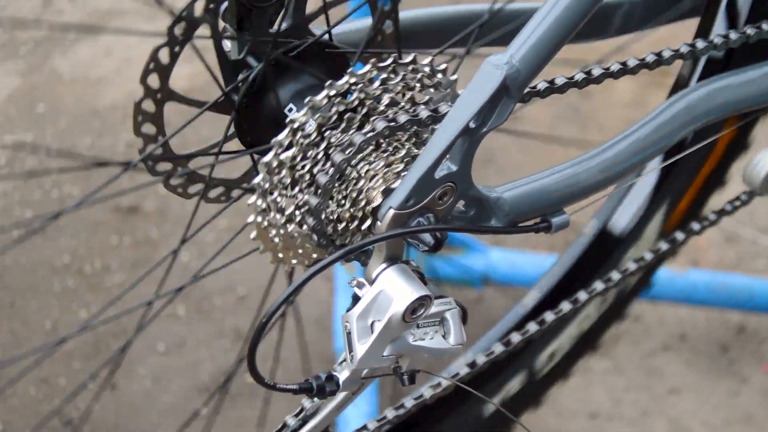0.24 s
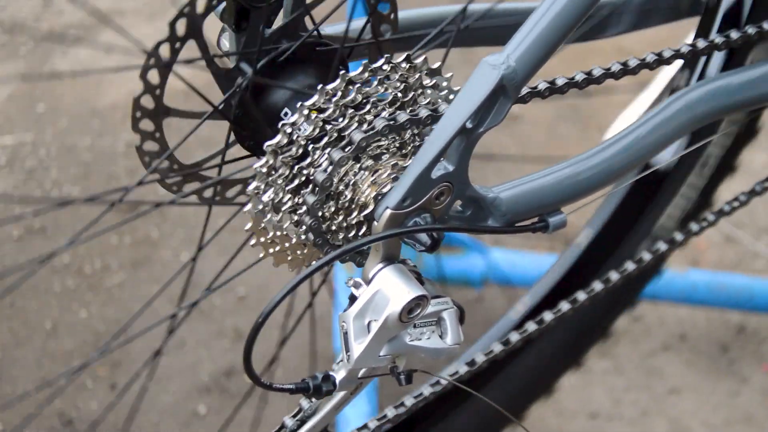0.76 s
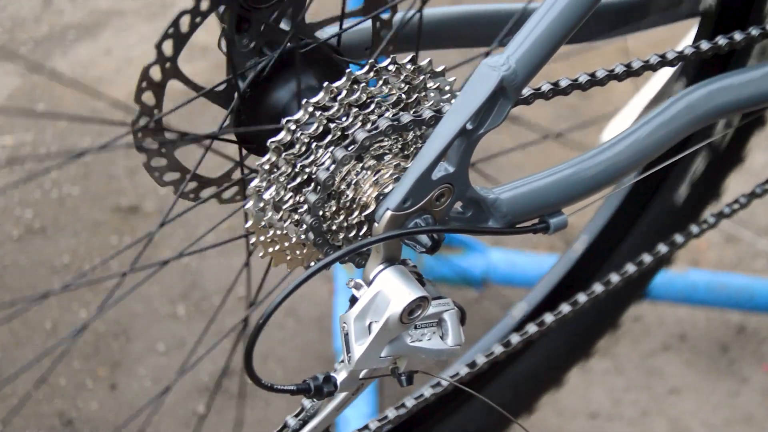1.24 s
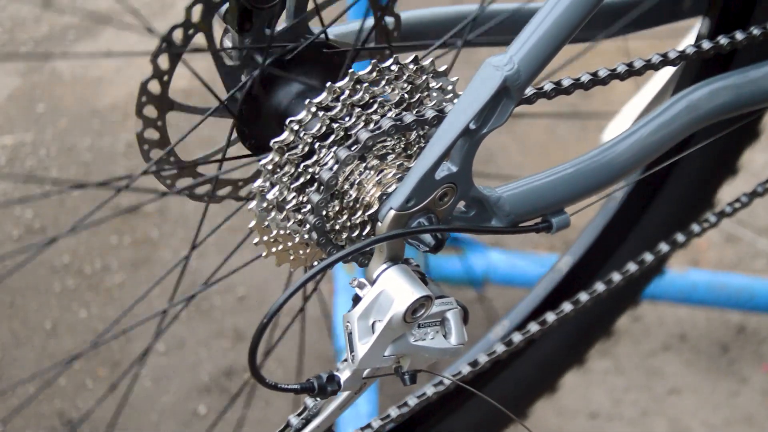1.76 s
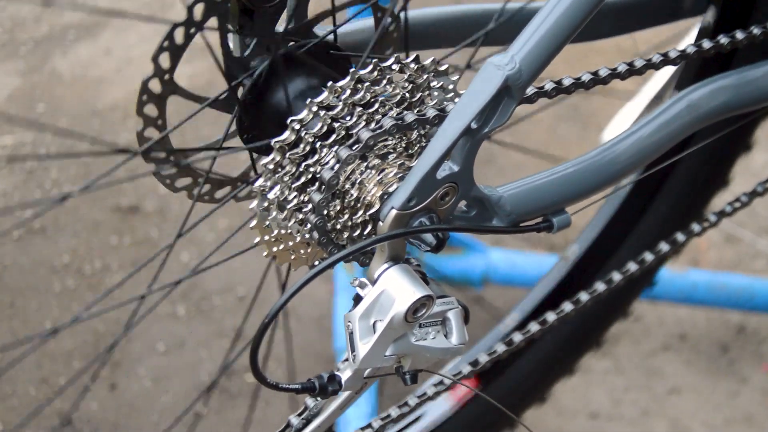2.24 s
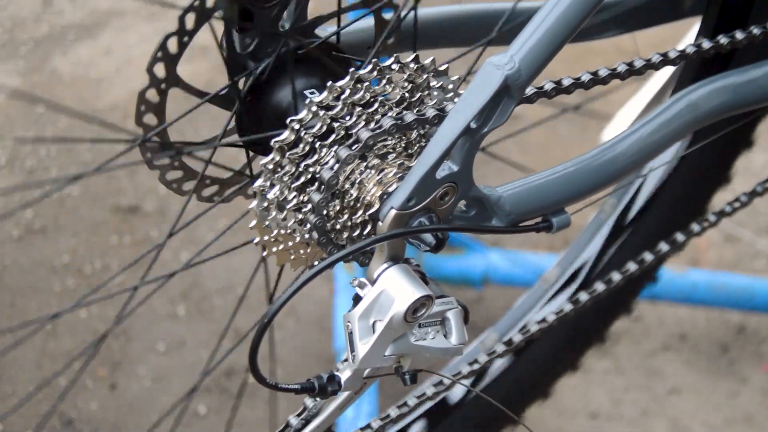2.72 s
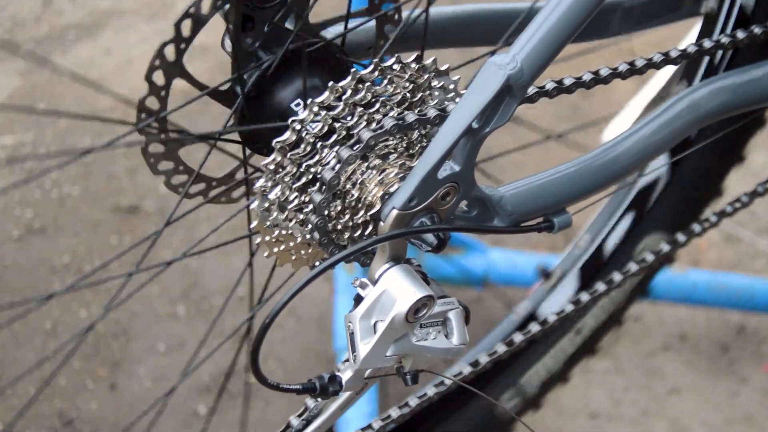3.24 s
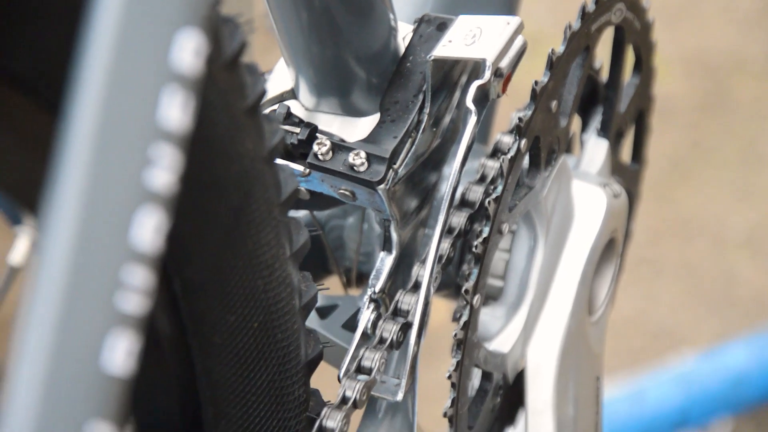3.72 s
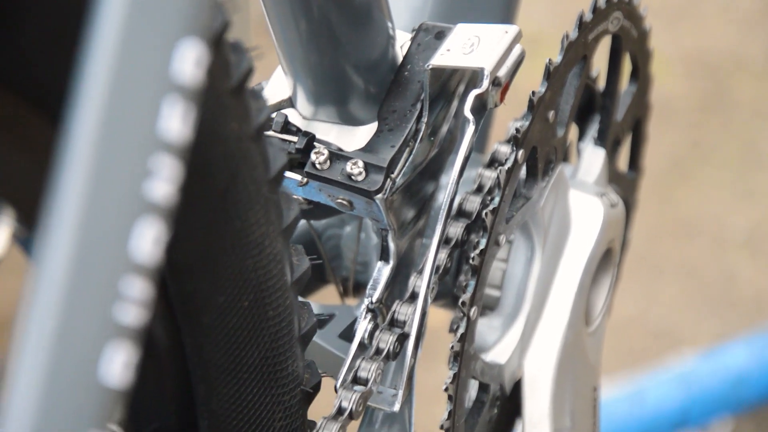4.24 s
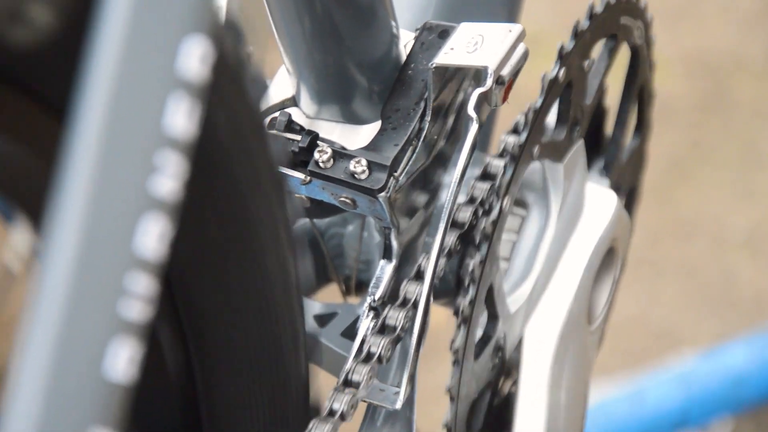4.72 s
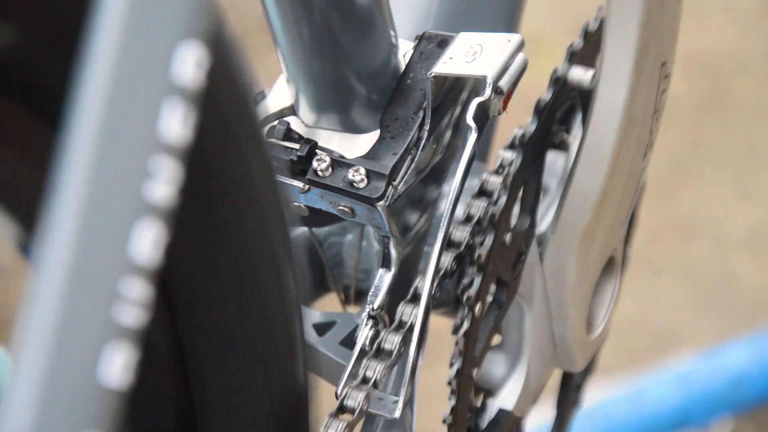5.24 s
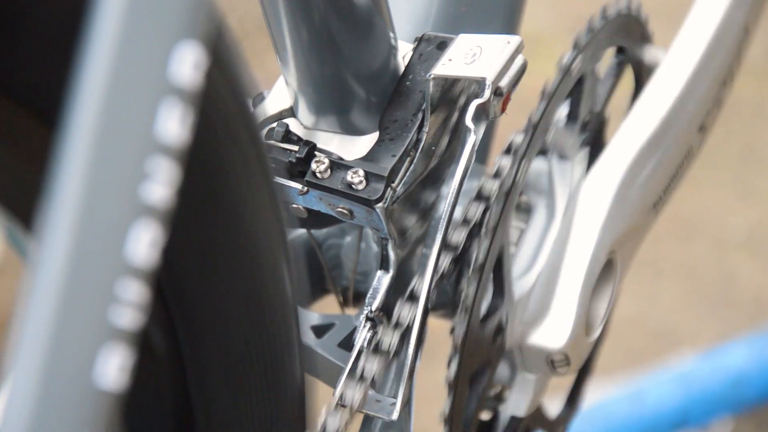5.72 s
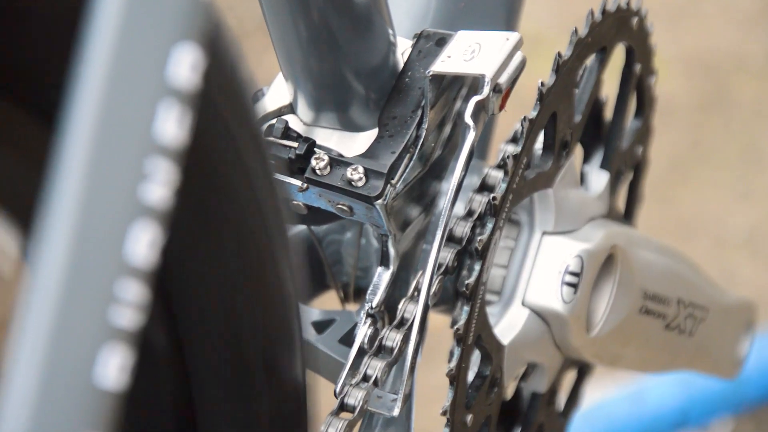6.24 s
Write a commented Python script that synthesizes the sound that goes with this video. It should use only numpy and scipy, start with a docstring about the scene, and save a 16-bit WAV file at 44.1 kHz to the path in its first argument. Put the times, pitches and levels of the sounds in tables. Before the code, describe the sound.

Close mono pickup of a bicycle on a work stand in an open workshop, over soft outdoor air, faint low hums and barely audible chain rustle. From 0 to 0.6 s come a few small clicks and thin pings. At 0.85 s the freehub starts ticking: bright, dry steel snaps, nearly fifteen per second, slowing evenly to about twelve and ending near 3.4 s, each tick subtly doubling and tightening as the wheel turns. A click with a short ping falls at 3.5 s, then near quiet with a soft thud at 3.9. Around 4.8 s there are clicks and a faint scrape; at 5.05 s a loud clank, at 5.15 a brighter ringing one. Ticks run from 5.33, becoming irregular, with dull thuds at 5.7-5.9 and hard knocks near 5.97. Steady ticking returns from 6.1 to the end at about 6.5. A small bird chirps faintly after 5.1.

```python
"""An open workshop with a bicycle on a work stand. The rear wheel coasts under constant deceleration and the
freehub pawls tick: filtered noise for the crack, damped sines for the hub. The crank is turned and the chain
drops onto another chainring with two bright clanks, of grainy noise and decaying modes; the pawls tick again.
Frame thuds, chain rustle and single clicks are coloured noise, hard knocks are pressure pulses, thin steel
pings. A small bird whistles in gliding sines over outdoor noise and faint low hums."""
import sys
import numpy as np
from scipy import signal
from scipy.fft import rfft, irfft, next_fast_len
from scipy.io import wavfile
from scipy.ndimage import uniform_filter1d

SR = 44100
rng = np.random.default_rng(int(sys.argv[2]) if len(sys.argv) > 2 else 0)


def to_wav(sig):
    """Store sig (one row per channel, or 1-D mono) as 16-bit WAV at the path in sys.argv[1].

    Samples outside -1..1 are clipped; the rate is SR.
    """
    pcm = np.clip(np.atleast_2d(sig), -1, 1) * 32767
    pcm = np.round(pcm).astype(np.int16)
    wavfile.write(sys.argv[1], SR, pcm.T)  # frames by channels


N = 285327   # length [samples]
AGE = np.arange(2 ** 14) / SR   # time since a contact [s]
CUTOFF_HZ = 15900

# Spectra below are relative densities; levels of blows are nominal, before the mix of their parts.
# Outdoor air, spectrum: (frequency [Hz], level [dB per Hz])
AIR_SPECTRUM = [(20, -10), (45, 0), (90, -0.5), (150, -3.5), (230, -5.5), (380, -9.5), (650, -8.5),
                (1020, -6.5), (1400, -12), (1900, -12.5), (2700, -20.5), (4500, -25.5), (10800, -28),
                (16000, -34)]
# Slow swell of the distant noise, used as deviation from its mean: (time [s], level [dB])
AIR_SWELL = [(0.0, -53), (2.99, -50.5), (4.18, -52.5), (5.0, -52)]
RUMBLE_DB, MIDDLE_DB, HISS_DB = -56.5, -52.6, -59   # air below 250 Hz, in between, above 2800 Hz
RUMBLE_FOLLOWS, MIDDLE_FOLLOWS = 0.51, 0.89   # share of the swell in each band
HISS_FOLLOWS = 0.33   # share of the chain's level swing in the hiss
# Faint low hums, one of them (88 Hz) the drone of the spinning wheel:
# (middle [s], width [s], frequency [Hz], level [dB])
HUM_SWELLS = [(.1, .4, 161, -65), (.48, 0.14, 56.5, -54), (1.98, 0.29, 55.9, -61), (2.7, 1.1, 88.1, -63),
              (5.2, 1.15, 162.3, -63.5), (5.3, .33, 56.4, -56)]

# Bird notes: (time [s], length [s], start frequency [Hz], end frequency [Hz], level [dB])
BIRD_NOTES = [(5.092, .019, 4250, 4230, -43), (5.179, 0.044, 4820, 4900, -44.5),
              (5.357, 0.049, 4700, 4680, -47.5), (5.483, .015, 4800, 5300, -49),
              (5.492, 0.022, 4340, 4420, -43.5), (5.518, 0.015, 5440, 5130, -44),
              (5.555, 0.013, 4450, 4900, -45.5), (5.591, 0.032, 3870, 4180, -42.5),
              (5.636, 0.024, 4240, 4950, -43.5), (6.052, .031, 4450, 3330, -46.5),
              (6.1, .039, 3530, 3330, -48.5), (6.148, 0.025, 3540, 3480, -43.5),
              (6.203, .017, 4000, 3300, -46), (6.384, .022, 4260, 4200, -52)]
BIRD_SAG_HZ = 30   # dip at the middle of each glide

# Dull blows through frame and stand: (time [s], level [dB])
THUDS = [(.984, -43), (3.922, -39.5), (3.937, -43), (5.6967, -28), (5.788, -29.5), (5.803, -30),
         (5.847, -36), (5.872, -35.5)]
# Thud spectrum: (frequency [Hz], level [dB per Hz])
THUD_SPECTRUM = [(60, -21), (240, -1.5), (420, -7.5), (680, -0.5), (1150, -7.5), (1900, -9), (3200, -17),
                 (5500, -18.5), (9000, -24.5), (16000, -40)]
THUD_T60_S = 0.06
# Dry knocks of the handled crank: (time [s], peak level [dB], frequency [Hz])
KNOCKS = [(5.777, -40, 89), (5.9546, -26.5, 1390), (5.9611, -23.5, 1700), (5.9835, -19, 1130),
          (6.016, -32.5, 1810)]
# Spectrum of the tail of a knock: (frequency [Hz], level [dB per Hz])
KNOCK_TAIL_SPECTRUM = [(150, -31), (500, -9), (1300, 3.5), (2000, -9.5), (4000, -16.5), (12000, -33)]

# Chain creeping over the sprockets: (time [s], level [dB])
RUSTLE = [(0, -58.5), (.85, -60), (3.3, -62), (3.7, -62), (4.45, -62), (4.7, -63.5), (5.0, -55),
          (5.85, -56), (6.47, -55)]
# Single clicks of the drivetrain, chain links or slow pawls: (time [s], level [dB], brightness [dB per octave])
CLICKS = [(.092, -45.5, 2), (0.2183, -34.5, 5.5), (.286, -43.5, -9), (.311, -46, 6), (.342, -44, 1),
          (.525, -43.5, -4), (.536, -42.5, -3), (0.5745, -32, 2), (3.5085, -34.5, -2.5), (4.058, -42.5, 3),
          (4.8031, -32.5, 3.5), (4.8933, -40.5, 6), (4.9125, -43, -7.5), (4.9612, -41.5, -2)]
# Click and rustle spectrum: (frequency [Hz], level [dB per Hz])
CLICK_SPECTRUM = [(800, -14), (2500, -9.5), (4300, -3), (6000, -6), (8500, -3), (10600, -0.5), (12500, -17),
                  (16000, -16.5)]
CLICK_T60_S = 0.025
# Lesser clicks fall at random: rate, level above the rustle and its spread
SMALL_CLICKS_PER_S, SMALL_CLICK_DB, SMALL_CLICK_SPREAD_DB = 7, 11, 3.5
# Thin steel parts pinging: (time [s], frequency [Hz], peak level [dB], T60 [s])
PINGS = [(.3427, 2390, -54, 0.3), (0.312, 4110, -54.5, 0.81), (.3427, 6660, -42, 0.1),
         (3.51, 2260, -43, 0.069), (3.5101, 4740, -39, 0.1), (4.007, 5300, -47, 0.091)]

# The chain rubs on the shifter's cage before it drops: middle, width, level
RUB_S, RUB_WIDTH_S, RUB_DB = 4.85, .13, -54.5
# Rubbing spectrum: (frequency [Hz], level [dB per Hz])
RUB_SPECTRUM = [(1300, -20), (1900, 3), (2500, -7), (4200, -14), (9000, -24)]

# Chain striking the chainring: (time [s], level [dB], brightness [dB per octave],
# change per roller [dB], clatter T60 [s], free ring relative to the blow [dB])
CHAIN_BLOWS = [(5.0185, -34.5, 4.5, -10, 0.027, -14), (5.0489, -16, -1.75, -1.5, 0.012, -6.5),
               (5.1148, -35, -1.5, -3, 0.063, -14), (5.151, -26, 6, 3.8, .02, 2.5)]
# Landings of the three rollers in each blow: (delay [s])
ROLLER_DELAYS = (0, .0036, .0102)
# Chainring modes: (frequency [Hz], relative level [dB], T60 [s])
CHAINRING_MODES = [(1670, -12, 0.17), (1850, -9, 0.091), (2115, -5.5, 0.11), (2360, -5, 0.054),
                   (2550, -0.5, 0.13), (3150, -0.5, 0.018), (3780, 3, 0.044), (3940, 2, 0.13),
                   (4960, -16, 0.14), (5350, -23, 0.046), (5850, -7, .08), (6890, -18, .15),
                   (7230, -7, 0.043), (7770, -0.5, 0.13), (8385, -9, 0.12), (9080, -9, 0.17),
                   (9600, -14, .1), (10220, -4.5, 0.08), (10600, -4, 0.078), (11030, -13, 0.047),
                   (12300, -17, .05), (13750, -24, .04), (14700, -25, .04)]
# Clatter spectrum: (frequency [Hz], level [dB per Hz])
CLATTER_SPECTRUM = [(200, -31), (500, -13), (1200, -8.5), (2400, -1.5), (3800, 2.5), (5000, -1.5),
                    (6500, -2), (8000, 0.5), (10500, 0), (12800, -15), (16000, -27)]

# Later pawl ticks: two steady runs, with irregular ones between as the crank turns:
# (time [s], level [dB], lead of the earlier pawl [s])
LATER_PAWLS = [(5.333, -25, .001), (5.3958, -24.5, .001), (5.459, -26.5, .0012), (5.5236, -25.5, .0007),
               (5.6228, -26, .0051), (5.6957, -23, .004), (5.8156, -32, .001), (6.0905, -26, .002),
               (6.155, -23.5, .001), (6.2186, -21, .001), (6.283, -22, .002), (6.347, -26, .003),
               (6.4131, -24.5, 0.0018)]
# Hub resonances: (frequency [Hz], relative level [dB], T60 [s])
HUB_MODES = [(4420, -19, 0.023), (6020, -8.5, 0.021), (7720, -14.5, 0.05), (8990, -6, 0.05),
             (9086, 7.5, 0.028), (9500, -16.5, 0.15), (9060, -18.5, 0.17), (10330, -6, 0.019),
             (10600, -24, 0.031), (10600, -18, 0.022), (11350, -13.5, 0.092), (12100, -20, 0.02),
             (14000, -19, .03)]
# Crack of steel on steel: (frequency [Hz], level [dB per Hz])
PAWL_SPECTRUM = [(1000, -33), (3200, -30), (4100, -15.5), (7100, -16), (8400, -10.5), (9200, -2),
                 (9900, -4), (10800, 1.5), (11900, -4.5), (12900, -11.5), (14000, -16), (15600, -16.5),
                 (17000, -35)]
COAST_START_S, COAST_TEETH, TEETH_PER_TURN = .855, 35, 16
TEETH_PER_S, SLOWING_PER_S = 14.707, 1.139   # initial speed, and the speed friction takes away each second
# The wheel's heavy spot hurries and delays the teeth once a turn: time shift, and the tooth when it is on top
UNBALANCE_S, HEAVY_TOOTH = .00425, 11.3
# The ratchet runs slightly off centre, so its two pawls drift apart and together once a turn
WIDEST_TOOTH, LEAD_MIN_S, LEAD_MAX_S = 10.7, .0003, .006
# Level with pawls together; loss when farthest apart; earlier pawl relative to the main one
COAST_DB, APART_LOSS_DB, LEAD_DB = -26, 2, -7


def from_db(db):
    """Amplitude ratio: decibels to gain."""
    return 10 ** (np.asarray(db) / 20)


def rms_one(x):
    """Normalisation: scale to unit power."""
    return x / np.sqrt(np.mean(x ** 2) + 1e-20)


def in_time(rows):
    """Linear interpolation: join curve rows by straight lines, one array for each column."""
    s, *columns = np.transpose(rows)
    return [np.interp(np.arange(N) / SR, s, c) for c in columns]


def fade(t60):
    """Exponential decay: the amplitude falls by 60 dB in t60 seconds."""
    return np.exp(-np.log(1000) * AGE / max(t60, 1e-4))


def add(track, s, sound):
    """Superposition: mix a sound into the track from a given time on."""
    at = int(np.clip(round(s * SR), 0, N - 1))
    track[at:at + len(sound)] += sound[:N - at]


def colour(x, spectrum, tilt_db=0):
    """Linear filtering: give a signal a spectrum, tilted in dB per octave, at rms 1."""
    size = next_fast_len(len(x))
    octave = np.log2(np.maximum(np.fft.rfftfreq(size, 1 / SR), 1))
    hz, db = np.transpose(spectrum)
    lowest = np.log2(hz[0])
    shape_db = np.interp(octave, np.log2(hz), db)
    slope_db = tilt_db * np.maximum(octave, lowest)
    low_cut_db = 20 * np.minimum(octave - lowest, 0)   # 20 dB per octave below the first row
    gain = from_db(shape_db + slope_db + low_cut_db)
    return rms_one(irfft(rfft(x, size) * gain, size)[:len(x)])


def dense_ring(spectrum, envelope, tilt_db=0):
    """High modal density: overlapping modes act as coloured noise with the energy of its envelope."""
    x = colour(rng.standard_normal(len(AGE)), spectrum, tilt_db) * envelope
    return rms_one(x) * np.sqrt(np.mean(envelope ** 2))


def modal_ring(modes, scatter_db, tilt_db=0, detune=0, damped=1):
    """Modal superposition: damped sines of varying strength, optionally detuned and choked; starts at rms 1."""
    mode_hz, db, mode_t60 = np.transpose(modes)
    strength, shift, phase = rng.standard_normal((len(mode_hz), 3)).T
    gains = from_db(db + tilt_db * np.log2(mode_hz) + scatter_db * strength)
    detuned_hz = mode_hz * (1 + detune * shift)
    ring = np.zeros(len(AGE))
    for gain, t60, hz, turns in zip(gains, mode_t60, detuned_hz, phase):
        ring += gain * fade(t60) * np.sin(2 * np.pi * (hz * AGE + turns))
    return damped * ring / np.sqrt(np.sum(gains ** 2) / 2)


def air():
    """Broadband ambient noise: rumble and middle swell slowly, the hiss follows the chain's level a little."""
    swell_db, = in_time(AIR_SWELL)
    chain_db, = in_time(RUSTLE)
    swell_db = swell_db - swell_db.mean()
    chain_db = chain_db - chain_db.mean()
    noise = colour(rng.standard_normal(N), AIR_SPECTRUM)
    rumble = signal.sosfiltfilt(signal.butter(2, 250, fs=SR, output="sos"), noise)
    hiss = signal.sosfiltfilt(signal.butter(3, 2800, "high", fs=SR, output="sos"), noise)
    middle = noise - rumble - hiss
    out = from_db(RUMBLE_DB + RUMBLE_FOLLOWS * swell_db) * rms_one(rumble)
    out += from_db(MIDDLE_DB + MIDDLE_FOLLOWS * swell_db) * rms_one(middle)
    out += from_db(HISS_DB + HISS_FOLLOWS * chain_db) * rms_one(hiss)
    return out


def hum():
    """Frequency modulation: faint low hums, one the spinning wheel's drone, swell and waver in pitch."""
    out, t = np.zeros(N), np.arange(N) / SR
    for s, width, hz, db in HUM_SWELLS:
        waver = 0.024 * rms_one(uniform_filter1d(rng.standard_normal(N), size=6000))
        tone = np.sqrt(2) * np.sin(2 * np.pi * np.cumsum(hz * (1 + waver)) / SR)
        out += from_db(db) * np.exp(-((t - s) / width) ** 2) * tone
    return out


def bird():
    """Frequency glide and reverberation: quavering whistles swell and fade, blurred by yard reflections."""
    out = np.zeros(N)
    for s, length, start_hz, end_hz, db in BIRD_NOTES:
        along = np.minimum(AGE / length, 1)
        hz = start_hz + (end_hz - start_hz) * along - BIRD_SAG_HZ * np.sin(np.pi * along)
        quaver = 0.013 * rms_one(uniform_filter1d(rng.standard_normal(len(AGE)), size=120))
        whistle = np.sin(2 * np.pi * np.cumsum(hz * (1 + quaver)) / SR)
        swell = np.sqrt(4 * along * (1 - along))
        add(out, s, from_db(db) * swell * whistle)
    yard = rng.standard_normal(len(AGE)) * fade(0.13)
    reflections = signal.fftconvolve(out, yard / np.linalg.norm(yard))[:N]
    return out + from_db(-6.5) * reflections


def frame():
    """Impact excitation: soft blows shake the frame; hard knocks are one swing of pressure with a tail."""
    out = np.zeros(N)
    room = from_db(-18) * fade(.35)
    for s, db in THUDS:
        envelope = (fade(THUD_T60_S) + room) * (1 - fade(0.0035))
        add(out, s, from_db(db) * dense_ring(THUD_SPECTRUM, envelope))
    for s, db, hz in KNOCKS:
        turn = 2 * np.pi * (hz * AGE - 1)
        pulse = -turn * np.exp((1 - turn ** 2) / 2)   # crosses zero at the knock time, peaks at 1
        add(out, s - 1 / hz, from_db(db) * pulse)
        add(out, s, from_db(db - 16.0) * dense_ring(KNOCK_TAIL_SPECTRUM, fade(0.13)))
    return out


def chain():
    """Random impact trains: fine roller contacts rustle, single clicks fall and thin steel pings."""
    rustle_db, = in_time(RUSTLE)
    contacts = rng.random(N) < 900 / SR   # about 900 a second
    strength = from_db(4.2 * np.minimum(rng.exponential(1, N), 4))
    touches = contacts * strength * rng.choice([-1, 1], N)
    grains = signal.fftconvolve(touches, dense_ring(CLICK_SPECTRUM, fade(0.0022)))[:N]
    out = from_db(rustle_db) * rms_one(grains)

    small_db = rustle_db + SMALL_CLICK_DB + SMALL_CLICK_SPREAD_DB * rng.standard_normal(N)
    falls = (rng.random(N) < SMALL_CLICKS_PER_S / SR) * from_db(small_db)
    small_click = dense_ring(CLICK_SPECTRUM, fade(CLICK_T60_S), tilt_db=2.5)
    out += signal.fftconvolve(falls, small_click)[:N]

    click_envelope = fade(CLICK_T60_S) + from_db(-11.5) * fade(0.06)
    for s, db, bright_db in CLICKS:
        add(out, s, from_db(db) * dense_ring(CLICK_SPECTRUM, click_envelope, bright_db))
    for s, hz, db, t60 in PINGS:
        add(out, s, from_db(db) * fade(t60) * np.sin(2 * np.pi * hz * AGE))
    return out


def cage_rub():
    """Friction noise: the chain's side plates scrape briefly along the cage."""
    swell = np.exp(-((np.arange(N) / SR - RUB_S) / RUB_WIDTH_S) ** 2)
    return from_db(RUB_DB) * swell * colour(rng.standard_normal(N), RUB_SPECTRUM)


def gear_shift():
    """Mass loading: the chain's weight chokes and detunes the struck ring; a free ring sounds as well."""
    out = np.zeros(N)
    room, attack = from_db(-20) * fade(.22), 1 - fade(.002)
    for s, db, bright_db, step_db, t60, free_db in CHAIN_BLOWS:
        for roller, delay in enumerate(ROLLER_DELAYS):
            # each roller chatters as it lands, so the clatter comes in grains about a millisecond long
            grains = from_db(2 * rms_one(uniform_filter1d(rng.standard_normal(len(AGE)), size=40)))
            clatter = dense_ring(CLATTER_SPECTRUM, fade(t60) * grains + room, bright_db)
            choked = modal_ring(CHAINRING_MODES, scatter_db=2, tilt_db=bright_db, detune=.009,
                                damped=fade(1.6 * t60))
            blow = from_db(-2.4) * clatter + from_db(-2.0) * choked
            add(out, s + delay, from_db(db + roller * step_db) * blow * attack)
        free = modal_ring(CHAINRING_MODES, scatter_db=1.5, tilt_db=.5 * bright_db)
        add(out, s + ROLLER_DELAYS[1], from_db(db + free_db) * free * attack)
    return out


def pawl_drops():
    """Uniform deceleration: the slowing wheel's teeth, then the later ticks; (time [s], level [dB], lead [s])."""
    tooth = np.arange(COAST_TEETH)
    speed = np.sqrt(TEETH_PER_S ** 2 - 2 * SLOWING_PER_S * tooth)
    unbalance = UNBALANCE_S * np.sin(2 * np.pi * (tooth - HEAVY_TOOTH) / TEETH_PER_TURN)
    s = COAST_START_S + (TEETH_PER_S - speed) / SLOWING_PER_S + unbalance
    apart = np.cos(np.pi * (tooth - WIDEST_TOOTH) / TEETH_PER_TURN) ** 2
    lead = LEAD_MIN_S + (LEAD_MAX_S - LEAD_MIN_S) * apart
    return [*zip(s, COAST_DB - APART_LOSS_DB * apart, lead), *LATER_PAWLS]


def freehub():
    """Impact and resonance: one pawl ticks lightly, the other snaps down, bounces and sets the hub ringing."""
    out = np.zeros(N)
    for s, db, lead in pawl_drops():
        bounce_s = .0012 * from_db(3 * rng.standard_normal())
        bounce = np.interp(AGE - bounce_s, AGE, fade(0.0058), left=0)
        tail = from_db(-7) * fade(0.035) + from_db(-32.5) * fade(.2)   # the frame's dense ring, then the room
        snap = np.sqrt(fade(0.0073) ** 2 + (from_db(-4.5) * bounce) ** 2 + tail ** 2)
        crack = dense_ring(PAWL_SPECTRUM, snap * (1 - fade(0.0005)), tilt_db=0.31 * rng.standard_normal())
        ring = modal_ring(HUB_MODES, scatter_db=3.5, detune=.003) * (1 - fade(.0015))
        add(out, s, from_db(db + 3.5) * crack + from_db(db - 2.5) * ring)
        add(out, s - lead, from_db(db + LEAD_DB) * dense_ring(PAWL_SPECTRUM, fade(0.016)))
    return out


def scene():
    """Superposition: air, hums and bird behind, the drivetrain close by."""
    background = air() + hum() + bird()
    bicycle = frame() + chain() + cage_rub() + gear_shift() + freehub()
    return (background + bicycle)[None, :]


def record(dry):
    """Band limitation: one microphone, its top cut steeply by an elliptic low-pass."""
    return signal.sosfilt(signal.ellip(10, .2, 75, CUTOFF_HZ, fs=SR, output="sos"), dry)


dry = scene()
out = record(dry)
to_wav(out)
```